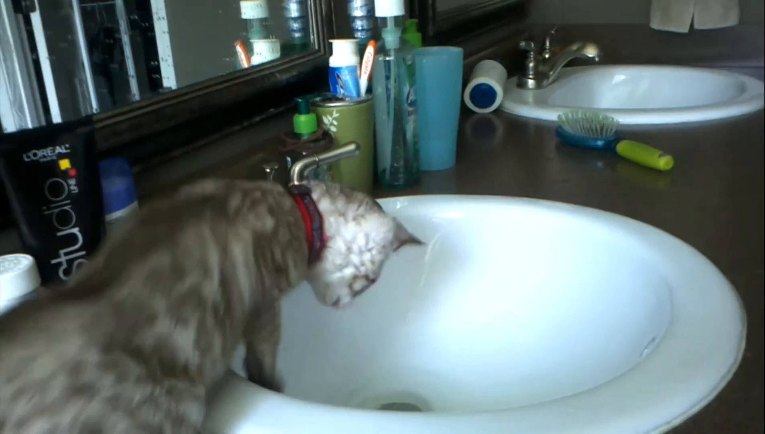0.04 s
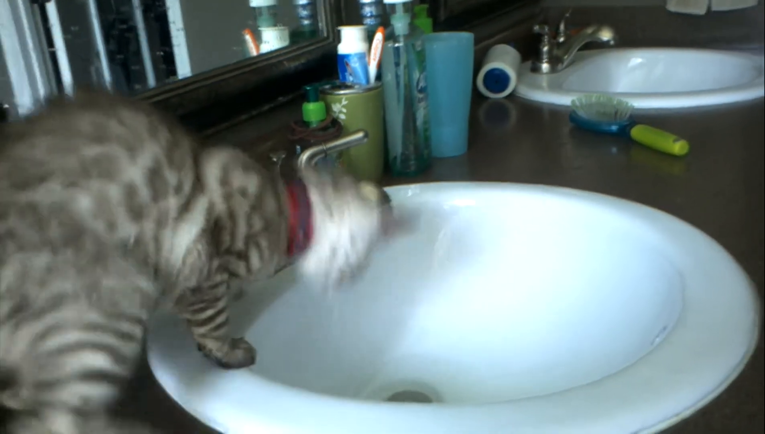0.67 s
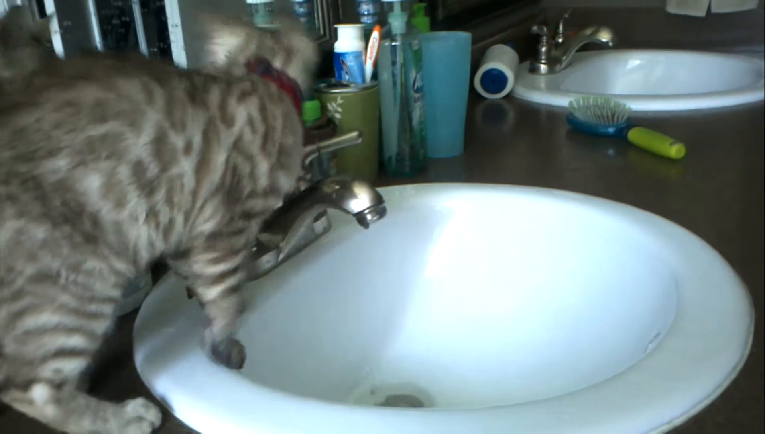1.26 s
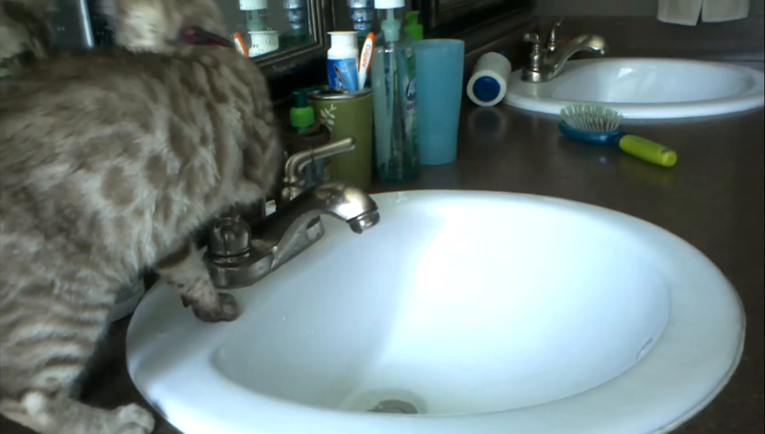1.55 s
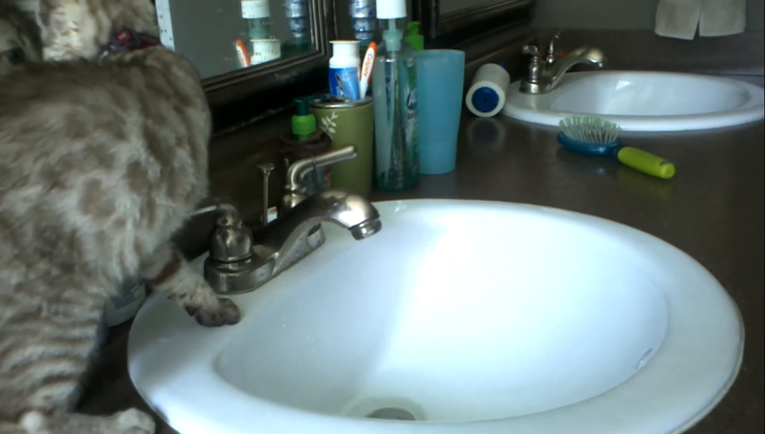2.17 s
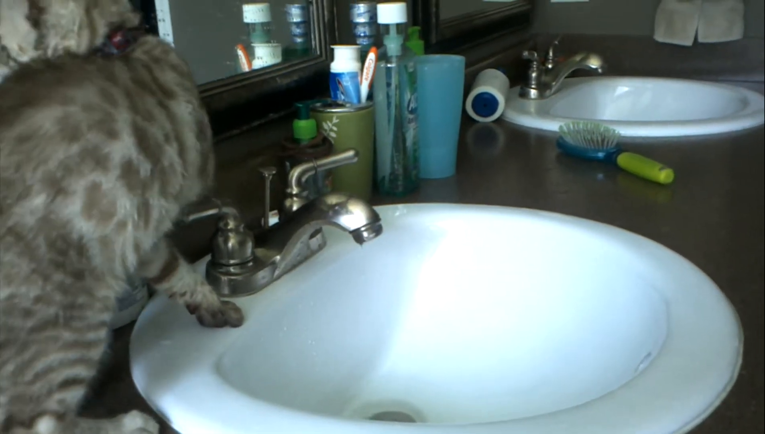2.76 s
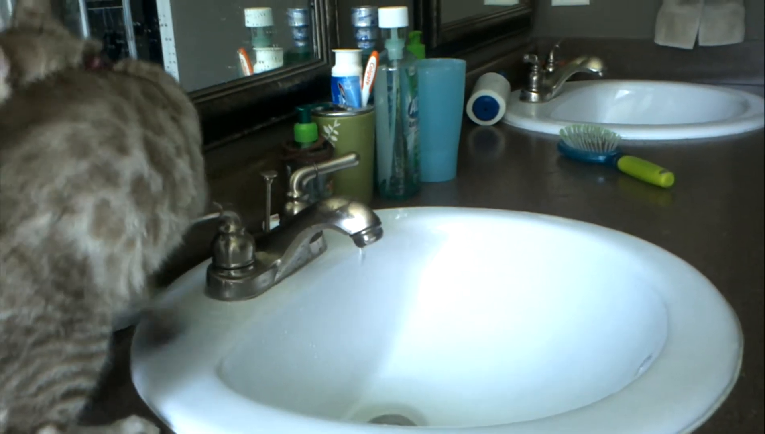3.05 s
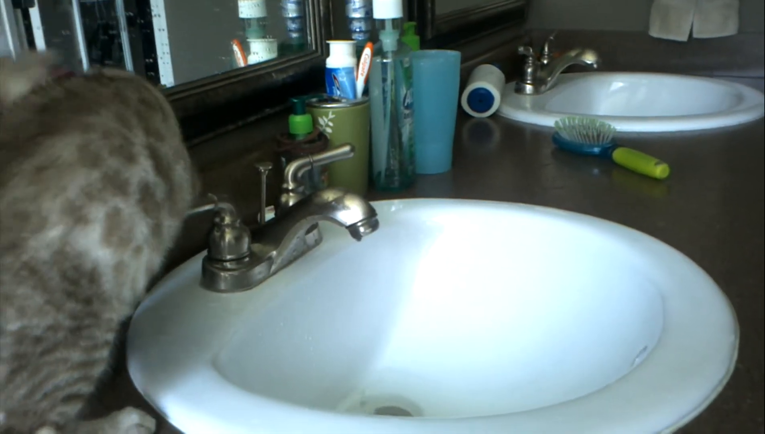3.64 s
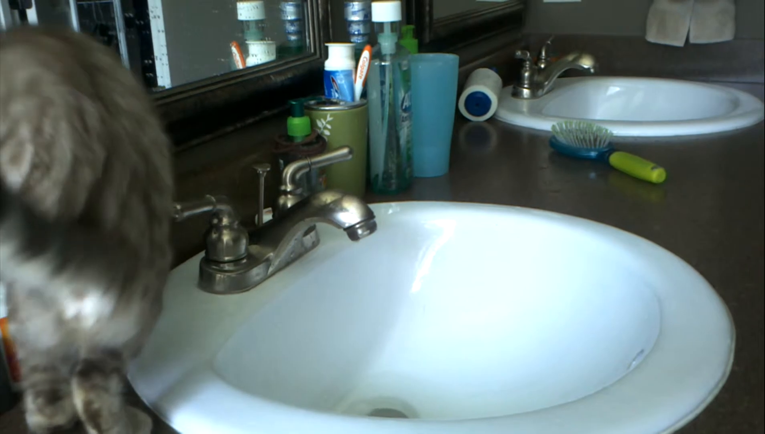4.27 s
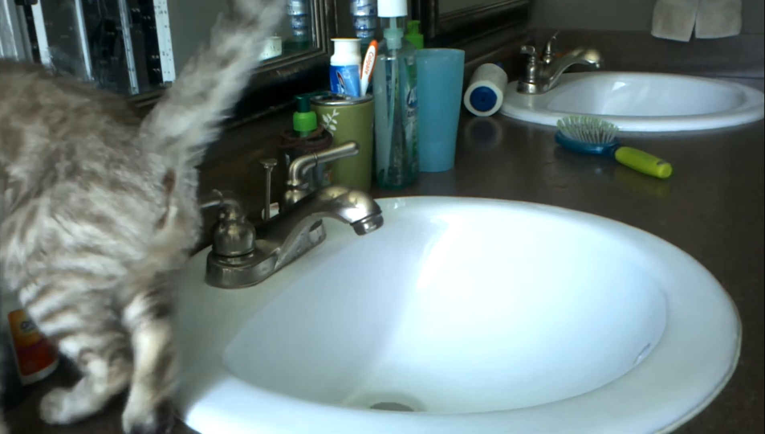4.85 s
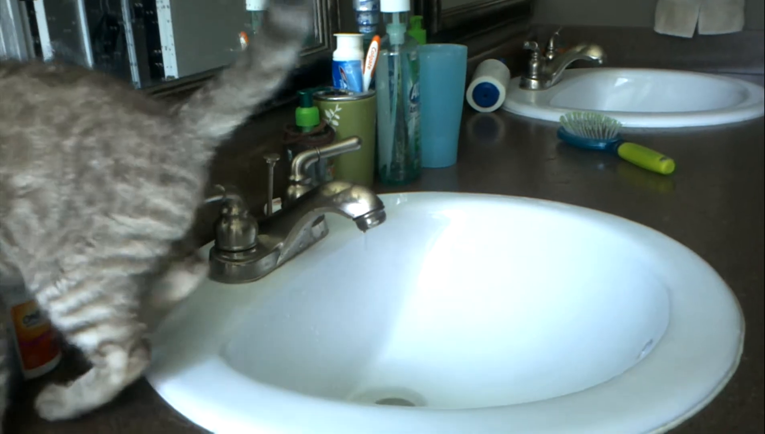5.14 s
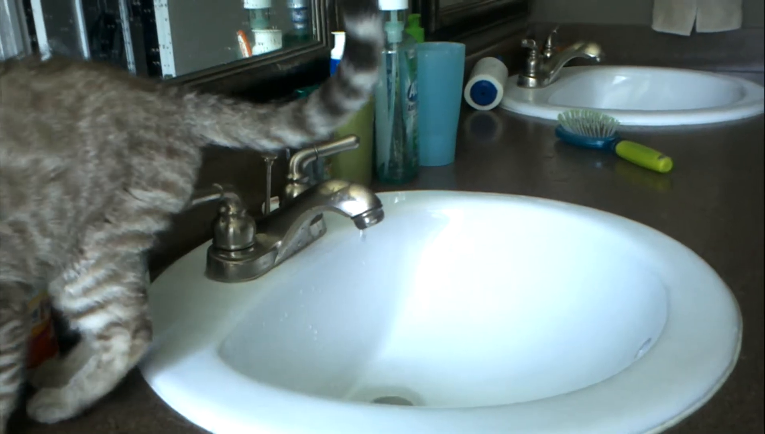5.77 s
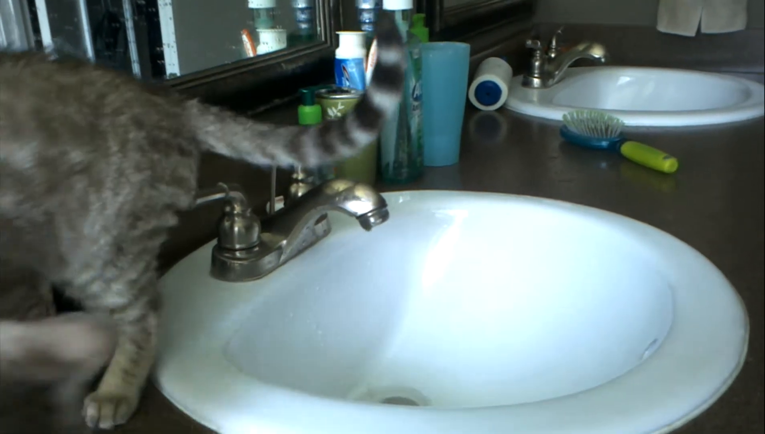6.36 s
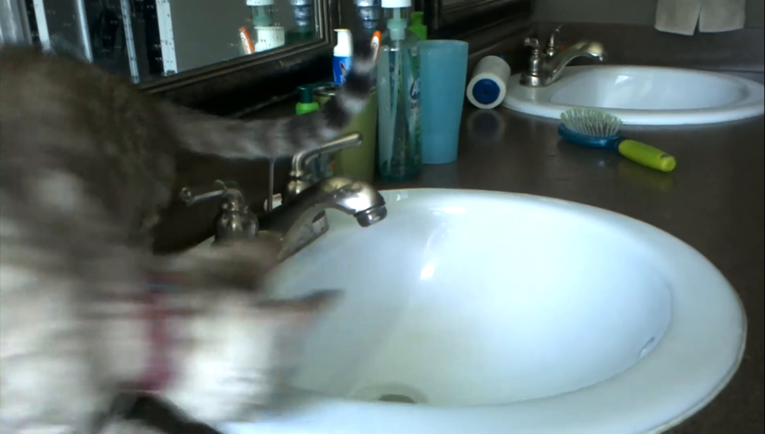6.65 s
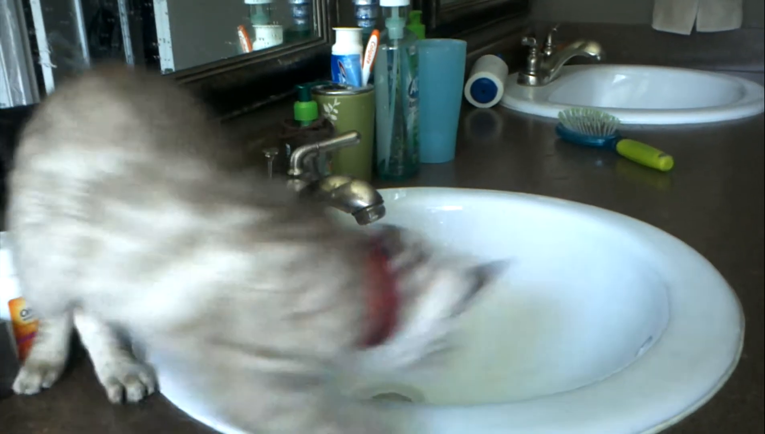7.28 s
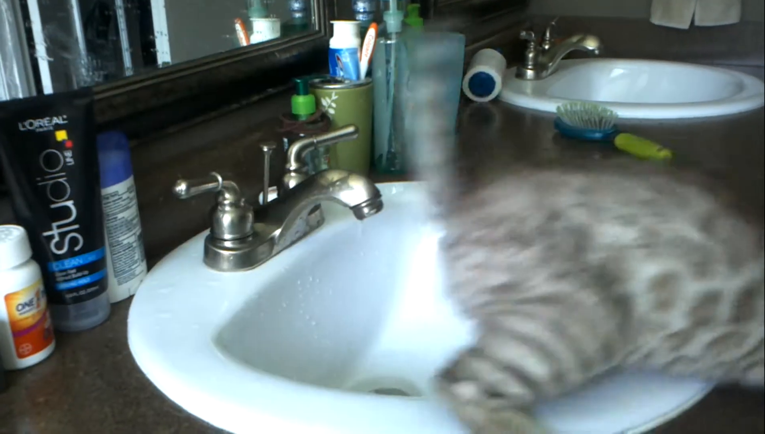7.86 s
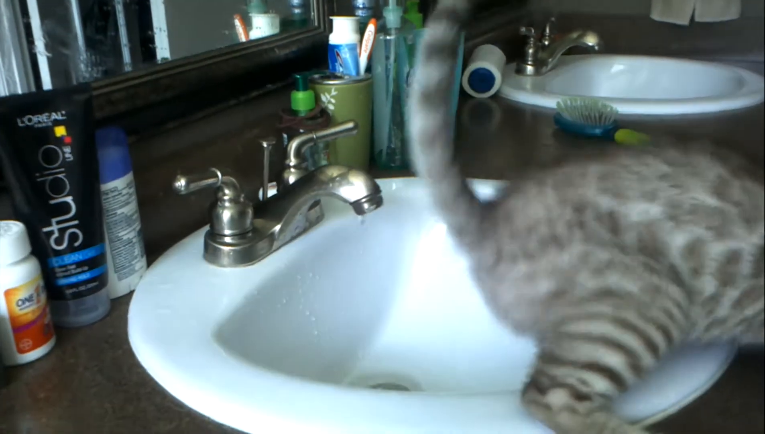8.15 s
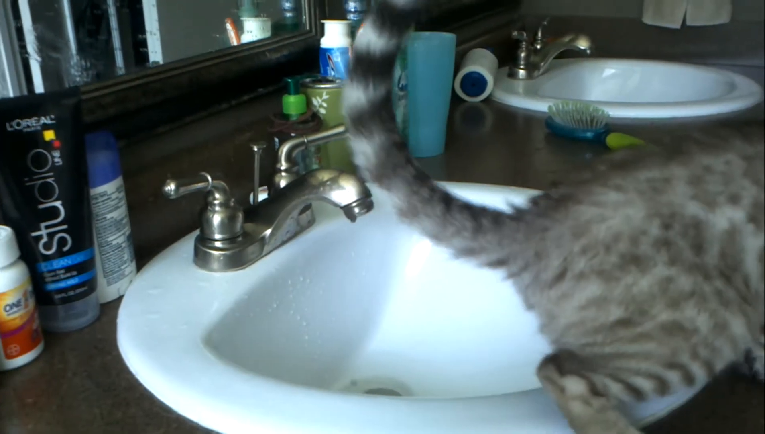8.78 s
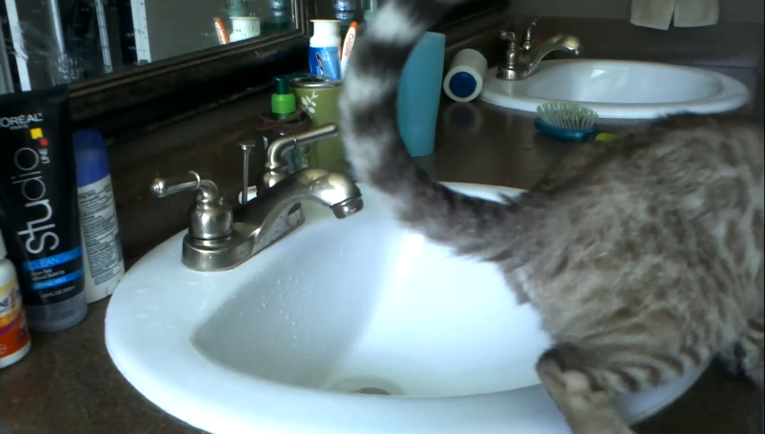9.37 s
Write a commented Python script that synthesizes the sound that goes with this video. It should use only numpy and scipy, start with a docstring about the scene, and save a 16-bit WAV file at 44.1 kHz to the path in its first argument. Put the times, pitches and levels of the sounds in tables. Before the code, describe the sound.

Water plinks into a bathroom drain as a cat bumps objects, its collar tinking and its paws thumping softly over the sink.

```python
"""A small bathroom, the microphone near a porcelain sink, over a low rumble and hiss. From the start the
faucet drips into the drain, about three plinks a second, each a trapped bubble ringing; some drops throw
up a droplet that pings as it falls back. A cat's collar tinks, and from about 3 to 4 s the cat knocks
against things on the counter by the mirror. Between 7 and 8 s it scrambles across the basin with clicking
claws, soft thumps and a faint chirrup. The dripping carries on to the end."""
import sys
import numpy as np
from scipy import signal
from scipy.fft import rfft, irfft
from scipy.io import wavfile
from scipy.ndimage import uniform_filter1d

SR = 44100
rng = np.random.default_rng(int(sys.argv[2]) if len(sys.argv) > 2 else 0)


def wav_out(sig):
    """Save sig, one row per channel (or a flat mono array), as 16-bit PCM at SR to the path in sys.argv[1]."""
    wavfile.write(sys.argv[1], SR, np.round(np.clip(np.atleast_2d(sig).T, -1, 1) * 32767).astype(np.int16))


N = 419832


def amp(db):
    """Decibels to gain."""
    return 10 ** (np.asarray(db) / 20)


def unit(x):
    """Scales to rms 1."""
    return x / np.sqrt(np.mean(x ** 2) + 1e-20)


def read(points, hz):
    """Reads a table on a log-frequency axis."""
    f, value = np.transpose(points)
    return np.interp(np.log(hz + 1), np.log(f + 1), value)


def add(mix, s, sound):
    """Mixes a sound in at time s."""
    part = mix[max(round(s * SR), 0):][:len(sound)]
    part += sound[:len(part)]


def colour(x, gain):
    """Filters by a gain that is a function of frequency."""
    return irfft(rfft(x) * gain(np.fft.rfftfreq(len(x), 1 / SR) + 1e-3), len(x))


def band(x, hz, octaves):
    """A bell-shaped band around hz."""
    return colour(x, lambda f: np.exp(-.5 * (np.log2(f / hz) / octaves) ** 2))


def ring(modes, t):
    """Struck modes: dying sines, neighbours swinging in opposite directions."""
    return sum((-1) ** k * amp(db - 60 * t / t60) * np.sin(2 * np.pi * hz * t)
               for k, (hz, db, t60) in enumerate(modes))


def snap(hz, octaves, t60, size=4096):
    """A burst of noise that dies at once, with peaks near 1."""
    t = np.arange(size) / SR
    burst = unit(band(rng.standard_normal(size), hz, octaves))
    fall = amp(-60 * t / t60)
    return .5 * burst * fall * np.linalg.norm(fall) / np.linalg.norm(burst * fall)


def strokes(rows):
    """A level that swells and fades in one arch for each stroke."""
    out = np.zeros(N)
    for s, length, db in rows:
        add(out, s, amp(db) * np.sin(np.pi * np.arange(0, 1, 1 / (length * SR))))
    return out


def room_tone(floor_db=-56, whine_hz=5770, whine_db=-80.5, halo_hz=5900, halo_db=-76.5):
    """Steady rumble and hiss, with a thin electrical whine in a halo of noise."""
    # spectrum of the rumble and hiss: (frequency [Hz], relative density [dB])
    spectrum = [(10, 4), (24, 5.5), (33, -8.5), (48, -2.5), (70, -17.5), (120, -12), (200, -21), (320, -20),
                (600, -25.5), (1200, -25.5), (2200, -25.5), (3500, -28.5), (6000, -30), (9500, -25.5),
                (12000, -34)]
    air, whine = rng.standard_normal((2, N))
    return (amp(floor_db) * unit(colour(air, lambda f: amp(read(spectrum, f))))
            + amp(whine_db) * unit(band(whine, whine_hz, octaves=0.0035))
            + amp(halo_db) * unit(band(whine, halo_hz, octaves=0.12)))


def room_tail(x, build_s=0.0055):
    """The bathroom's tail: dense reflections, each band dying at its own speed."""
    # reverberation time: (frequency [Hz], t60 [s])
    decay = [(150, 0.34), (400, 0.46), (1040, 0.34), (2760, 0.38), (7280, 0.4), (12000, 0.2)]
    taps = rng.choice([-1., 1.], SR) * (rng.random(SR) < .15)
    hz, t, bands = signal.stft(taps, SR, nperseg=256)
    fall = amp(-60 * t / read(decay, hz)[:, None])
    tail = signal.istft(bands * fall, SR, nperseg=256)[1]
    tail *= 1 - np.exp(-(np.arange(len(tail)) / SR / build_s) ** 2)
    return signal.fftconvolve(x, tail / np.linalg.norm(tail))[:N]


def echoes(x):
    """The direct sound and the first reflections to reach the microphone."""
    # off basin, mirror and walls: (delay [s], gain [ratio])
    reflections = [(.0031, .12), (.0064, -.17), (.0102, .1), (.0183, .09), (.0252, -.09)]
    out = x.copy()
    for delay, gain in reflections:
        add(out, delay, gain * x)
    return out


def shuffle(grain=0.48):
    """The cat shifts its weight: pads drag in uneven catches that sound through the counter."""
    # drags over the counter: (time [s], length [s], level [dB])
    drags = [(3.35, 0.059, -51), (3.735, 0.12, -55), (3.87, 0.19, -53)]
    # their spectrum: (frequency [Hz], relative level [dB])
    spectrum = [(50, -24), (115, -4), (200, -7), (320, 1), (520, -15), (750, -5.5), (1300, -20),
                (2200, -26), (5000, -40.5)]
    rub, catches = rng.standard_normal((2, N))
    rub *= np.exp(grain * unit(uniform_filter1d(catches, size=300)))
    return strokes(drags) * unit(colour(rub, lambda f: amp(read(spectrum, f))))


def scramble(leap_s=7.57, rumble_db=-45, rumble_hz=25, rub_hz=8300, grain=0.63):
    """The leaping body stirs the air while fur and pads rub in small catches."""
    # rubs over the basin: (time [s], length [s], level [dB])
    rubs = [(7.38, 0.37, -61), (7.665, 0.18, -52.5), (7.925, .08, -57)]
    corners = leap_s + np.cumsum([0, .06, .29, 0.084])  # rise, hold and fall [s]
    gust = np.interp(np.arange(N) / SR, corners, [0, 1, 1, 0])
    air, rub, catches = rng.standard_normal((3, N))
    grip = np.exp(grain * unit(uniform_filter1d(catches, size=90)))
    rub = unit(band(rub, rub_hz, octaves=0.6) * grip)
    air = unit(colour(air, lambda f: 1 / (1 + (f / rumble_hz) ** 4) * f / (f + rumble_hz)))
    return amp(rumble_db) * gust * air + strokes(rubs) * rub


def chirrup(start_s=7.84, length_s=.13, from_hz=220, to_hz=442, level_db=-55.5, jitter=0.0525):
    """The cat's voice glides upward, slightly rough and muffled by the shut mouth."""
    # response of the throat: (frequency [Hz], gain [dB])
    throat = [(250, 6.5), (450, -4), (700, -10), (1400, -18), (2000, -18), (2400, -4.5), (2900, -37),
              (4000, -45)]
    pitch = np.interp(np.arange(N) / SR, [start_s, start_s + length_s], [from_hz, to_hz])
    hz = pitch * (1 + jitter * unit(uniform_filter1d(rng.standard_normal(N), size=150)))
    level = strokes([(start_s, length_s, level_db)])
    hz, out = hz[level > 0], np.zeros(N)
    phase = 2 * np.pi * np.cumsum(hz) / SR
    voice = sum(amp(read(throat, k * hz)) * np.sin(k * phase) for k in range(1, 12))
    add(out, start_s, unit(voice))
    return level * out


def paws(rise_s=0.00066, puff_hz=380, puff_octaves=0.97, puff_t60=.11):
    """Soft pads push the basin: a low ring and a dull puff."""
    # paws on the basin: (time [s], thud level [dB], puff level [dB])
    landings = [(7.412, -60, -44), (7.498, -50, -58), (7.596, -39.5, -48.5), (7.664, -40.5, -49),
                (7.712, -42.5, -59), (7.781, -36, -44.5), (7.938, -51.5, -52), (8.12, -55, -62)]
    # the basin's modes: (frequency [Hz], relative level [dB], t60 [s])
    basin_modes = [(95.5, 0, 0.14), (129.7, -3.5, 0.2), (177, -8.5, 0.1), (327, -15, 0.086)]
    out, t = np.zeros(N), np.arange(SR // 2) / SR
    for s, db, puff_db in landings:
        thud = amp(db) * ring(basin_modes, t)
        add(thud, 0, amp(puff_db) * snap(puff_hz, puff_octaves, puff_t60, size=8192))
        add(out, s, thud * (1 - np.exp(-t / rise_s)))
    return out


def collar(rattle_db=-4, rattle_hz=6300, rattle_octaves=.22, rattle_t60=0.055):
    """A small piece of metal on the collar rattles and rings as the cat moves."""
    # jolts of the collar: (time [s], level [dB])
    tinks = [(0.85, -53), (0.8608, -46), (4.634, -38), (4.686, -57), (7.39, -41.5), (8.004, -51.5),
             (8.046, -48), (8.0566, -42), (8.0711, -37.5)]
    # the metal's modes: (frequency [Hz], relative level [dB], t60 [s])
    metal_modes = [(5790, -2, 0.037), (5984, -0.5, 0.043), (6320, -5.5, .035), (7500, -14, 0.027)]
    out, t = np.zeros(N), np.arange(SR // 5) / SR
    for s, db in tinks:
        add(out, s, amp(db) * ring(metal_modes, t))
        add(out, s, amp(db + rattle_db) * snap(rattle_hz, rattle_octaves, rattle_t60))
    return out


def clicks(centre_hz=7700):
    """Claws and collar click on hard things, with no ring of their own."""
    # hard contacts: (time [s], level [dB], width [octaves], t60 [s])
    contacts = [ (.3681, -36, 0.41, 0.0088), (0.9987, -29, 5.4, 0.0075), (1.7629, -28.5, 1.5, 0.072),
                (2.001, -31.5, .3, 0.0076), (2.2377, -40, 0.5, 0.014), (3.262, -16, 0.89, 0.0015),
                (3.984, -29, .6, 0.014), (6.3318, -28, 0.63, 0.0065), (6.902, -36.5, .4, 0.0063),
                (7.2763, -39, 0.54, .015), (7.3225, -38.5, .65, 0.027), (7.3538, -31, 1.06, 0.017),
                (7.3902, -29, 0.23, 0.021), (7.5942, -30, 3.1, 0.014), (7.6552, -37, 1.2, .04),
                (7.661, -14.5, 0.29, 0.0015), (7.7589, -40, .5, 0.0078), (7.7807, -25.5, 1.9, 0.011),
                (7.924, -39.5, 0.93, 0.018), (8.7212, -37, 0.4, 0.021)]
    out = np.zeros(N)
    for s, db, octaves, t60 in contacts:
        add(out, s, amp(db) * snap(centre_hz, octaves, t60))
    return out


def knocks(crack_db=-6, crack_hz=4000, edge_db=-9, edge_hz=9500, clatter_db=-7, clatter_hz=1100,
           ring_room_db=-7, note_cycles=17, low_hz=62):
    """Blows ring object and counter, softer ones with less treble. Gives (direct, to the room)."""
    # the cat bumps things, each with its own hollow note: (time [s], level [dB], contact cutoff [Hz],
    # relative counter boom [dB], note pitch [Hz], relative note level [dB], room send [dB])
    bumps = [ (2.8777, -35, 1800, -5, 1230, -13, 4), (2.8949, -12.5, 6050, -1.5, 805, -17, -2),
             (3.348, -22.5, 1560, -4, 455, -13, 1), (3.374, -37, 900, -4, 442, 2, -3.5),
             (3.7397, -26, 1510, 1, 1270, -16, -3), (3.9008, -29, 1480, -2, 786, -10, -4),
             (3.9881, -17.5, 1700, -9, 1016, -6, -7), (3.9914, -17.5, 7900, -3, 1150, -9.5, -3),
             (4.2399, -42.5, 3000, -1.5, 1720, -12, 2.5)]
    # modes of the bumped things and the hollow counter: (frequency [Hz], relative level [dB], t60 [s])
    object_modes = [ (340, -29.5, 0.049), (464, -28, 0.019), (807, -22.5, 0.033), (1030, -12, 0.016),
                    (1390, -9.5, 0.015), (1520, -22, 0.007), (2110, -18, 0.026), (2390, -26.5, 0.048),
                    (2730, -20, 0.008), (4010, -11, 0.008), (4630, -6.5, 0.0087), (7160, -24, 0.0029),
                    (9300, -16, 0.011)]
    counter_modes = [(117, -25.5, 0.15), (178, -25, 0.081), (326, -32.5, 0.084), (451.5, -25, 0.11),
                     (584, -35, .15), (684.5, -31, 0.15), (821, -33, 0.19)]
    out, t = np.zeros((2, N)), np.arange(SR // 2) / SR
    ringing = ring(object_modes, t)
    for s, db, bright_hz, boom_db, note_hz, note_db, room_db in bumps:
        body = amp(boom_db) * ring(counter_modes, t)
        body += amp(note_db - 60 * t * note_hz / note_cycles) * np.cos(2 * np.pi * note_hz * t)
        add(body, 0, amp(crack_db) * snap(crack_hz, octaves=4.5, t60=0.03))
        # summed over all directions, the object's modes blur into a broad clatter
        around = body + amp(ring_room_db) * ringing
        add(around, 0, amp(clatter_db) * snap(clatter_hz, octaves=0.86, t60=0.031))
        contact = signal.butter(2, bright_hz, fs=SR)
        # the harder the contact, the stronger its glassy edge
        edge = amp(edge_db) * (bright_hz / edge_hz) ** 2 * snap(edge_hz, octaves=0.18, t60=0.032)
        for path, blow, path_db in (out[0], body + ringing, db), (out[1], around, db + room_db):
            add(path, s, amp(path_db) * signal.lfilter(*contact, blow))
            add(path, s, amp(path_db) * edge)
    # small things radiate little bass
    return signal.lfilter(*signal.butter(2, low_hz, "high", fs=SR), out)


def spatter(per_s=5, level_db=-56, spread_db=13, centre_hz=8500):
    """Tiny droplets burst at random in the drain."""
    out = np.zeros(N)
    for when, size, pitch in rng.random((int(per_s * N / SR), 3)):  # each from 0 to 1
        burst = snap(centre_hz * 2 ** (pitch - .5), octaves=0.53, t60=0.01)
        add(out, when * N / SR, amp(level_db + spread_db * size) * burst)
    return out


def bubble(hz, t60, sharp=0.12, settle_s=0.0012, sag=0.041, sag_s=0.012, rise_s=0.00017):
    """A trapped bubble starts sharp, then sags in pitch as it rings."""
    t = np.arange(SR // 5) / SR
    glide = 1 + sharp * np.exp(-t / settle_s) - sag * np.tanh(t / sag_s) ** 2
    turns = np.cumsum(hz * glide) / SR
    return amp(-60 * t / t60) * (1 - np.exp(-t / rise_s)) * np.sin(2 * np.pi * turns)


def rebounds(ring_cycles=62, tick_hz=7000, tick_octaves=0.62, tick_t60=0.0097):
    """A thrown-up droplet falls back, ticks and traps a smaller bubble: the higher, the shorter."""
    # droplets landing about 0.13 s after their drop:
    # (time [s], bubble level [dB], bubble pitch [Hz], tick level [dB])
    droplets = [ (0.0313, -47, 4700, -40), (.3822, -45, 4100, -33.5), (0.7169, -45.5, 1670, -53),
                (1.397, -47, 4360, -40.5), (2.0814, -42.5, 2430, -43.5), (3.1131, -46.5, 1800, -58),
                (3.7892, -45, 3400, -32.5), (4.4588, -36.5, 9200, -46), (4.5295, -35, 8360, -47),
                (5.1572, -27, 9370, -29), (6.1703, -50, 1620, -44), (6.8458, -31.5, 9450, -51),
                (8.2753, -48, 3053, -48), (8.609, -38, 4370, -48), (9.242, -35.5, 5820, -40)]
    out = np.zeros(N)
    for s, db, hz, tick_db in droplets:
        add(out, s, amp(db) * bubble(hz, ring_cycles / hz, sharp=0.06, sag=.05, sag_s=.011))
        add(out, s, amp(tick_db) * snap(tick_hz, tick_octaves, tick_t60))
    return out


def drips(first_s=0.2448, period_s=0.34112, usual_db=-35, tick_db=-45, tick_growth=2.4, tick_hz=7200,
          plop_db=-9):
    """Drops fall in strict time; each ticks, plops and rings a bubble, and loud ones tick far harder."""
    # the drops in turn; the shortest trap no lasting bubble: (level [dB], bubble pitch [Hz], t60 [s])
    drops = [ (-33.5, 1636, 0.047), (-42.5, 1574, 0.054), (-42, 1557, 0.032), (-32.5, 1680, 0.067),
             (-36, 1880, 0.0053), (-33, 1485, 0.045), (-31, 2110, 0.08), (-36.5, 1565, 0.042),
             (-43, 1650, 0.028), (-51, 1570, 0.12), (-35.5, 1646, 0.057), (-42, 1400, .04),
             (-56, 1600, 0.037), (-35, 1900, 0.0054), (-33.5, 1556, .075), (-38.5, 1517, 0.049),
             (-34.5, 1737, .041), (-37, 1490, 0.039), (-31.5, 2600, 0.022), (-35, 1585, 0.051),
             (-39, 1502, .049), (-35, 1523, 0.051), (-40.5, 1512, 0.056), (-39, 1565, 0.075),
             (-44, 1464, 0.05), (-48.5, 1490, .034), (-41, 1547, 0.085), (-39, 1530, 0.055)]
    out = np.zeros(N)
    for k, (db, hz, t60) in enumerate(drops):
        s = first_s + k * period_s
        tick_gain = amp(tick_db + tick_growth * (db - usual_db))
        add(out, s, amp(db) * bubble(hz, t60))
        add(out, s, tick_gain * snap(tick_hz, octaves=0.71, t60=0.015))
        add(out, s, amp(db + plop_db) * snap(1.09 * hz, octaves=0.15, t60=0.048))
    return out


def scene(drip_room_db=-9, rebound_room_db=-4, click_room_db=-6, collar_room_db=-4, cat_room_db=-6,
          dull_hz=5000):
    """One microphone: the drain close and fairly dry, the knocks largely by way of the dulling room."""
    sources = [(drips(), drip_room_db), (rebounds() + spatter(), rebound_room_db),
               (clicks(), click_room_db), (collar(), collar_room_db),
               (paws() + chirrup() + shuffle(), cat_room_db)]
    knocks_direct, knocks_around = knocks()
    dulled = signal.lfilter(*signal.butter(1, dull_hz, fs=SR), knocks_around)
    near = echoes(knocks_direct + sum(sound for sound, _ in sources))
    tail = room_tail(dulled + sum(amp(room_db) * sound for sound, room_db in sources))
    return (near + tail + scramble() + room_tone())[None]


def record(dry, edge_hz=11450):
    """The recorder's band limit cuts off the top treble."""
    lowpass = signal.firwin(91, edge_hz, window=("kaiser", 8), fs=SR)
    return signal.oaconvolve(dry, lowpass[None], "same")


dry = scene()
out = record(dry)
wav_out(out)
```